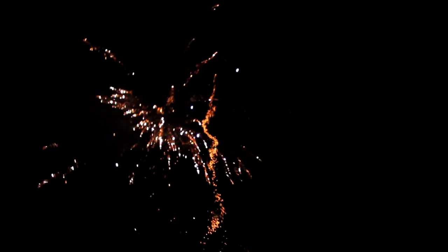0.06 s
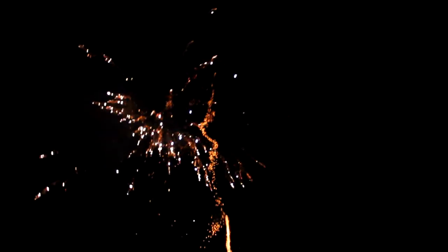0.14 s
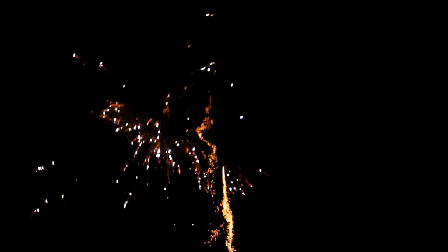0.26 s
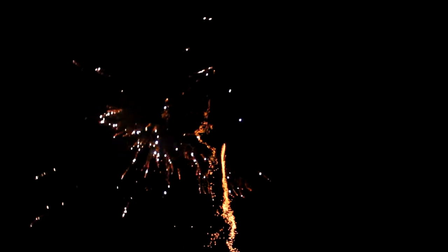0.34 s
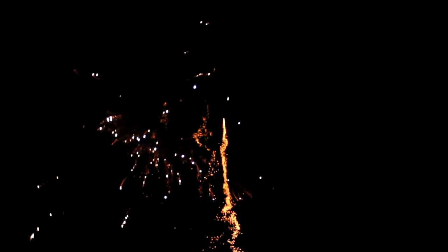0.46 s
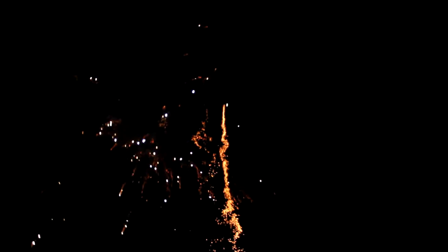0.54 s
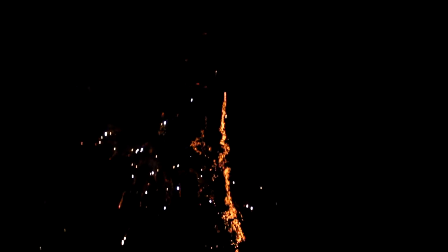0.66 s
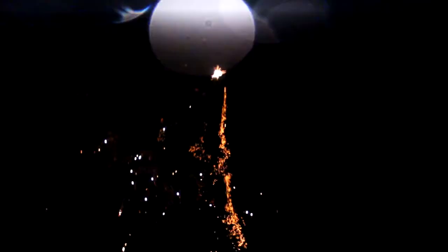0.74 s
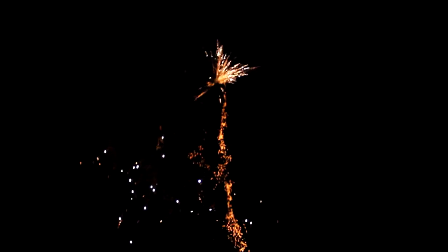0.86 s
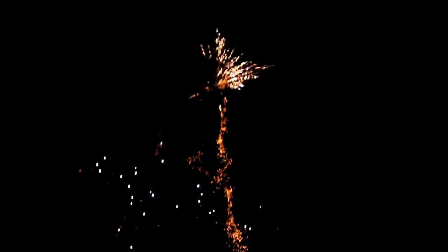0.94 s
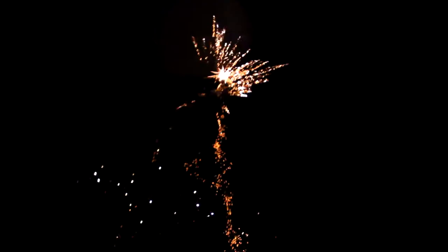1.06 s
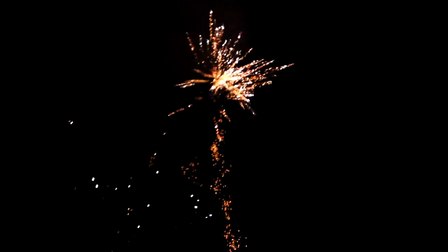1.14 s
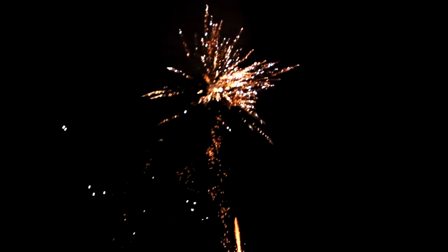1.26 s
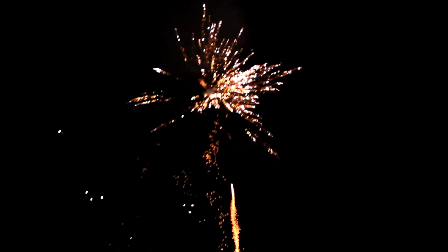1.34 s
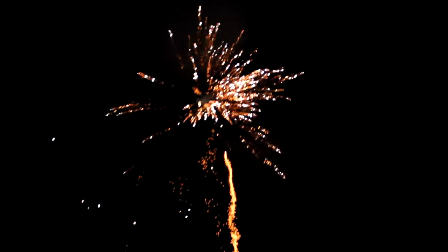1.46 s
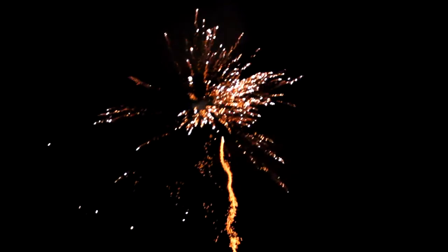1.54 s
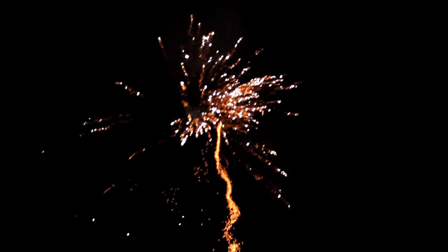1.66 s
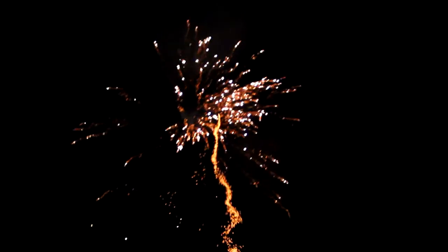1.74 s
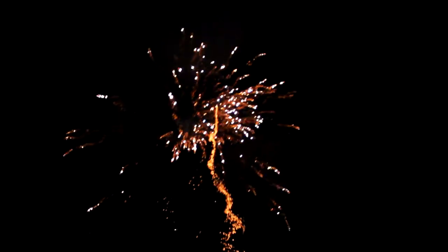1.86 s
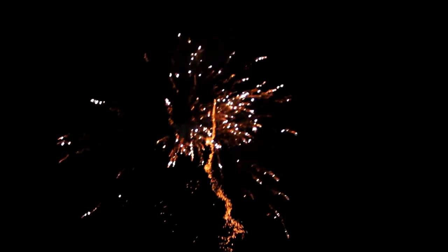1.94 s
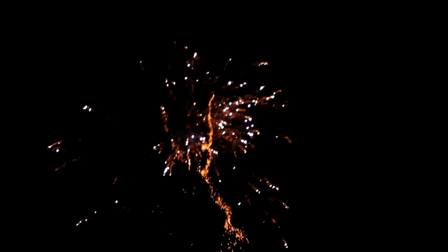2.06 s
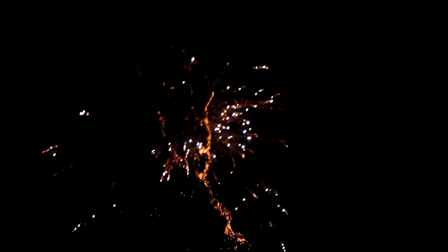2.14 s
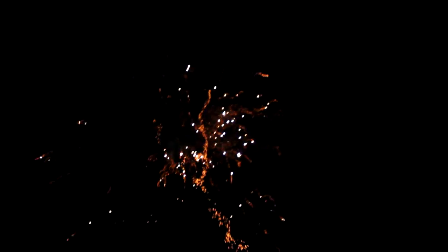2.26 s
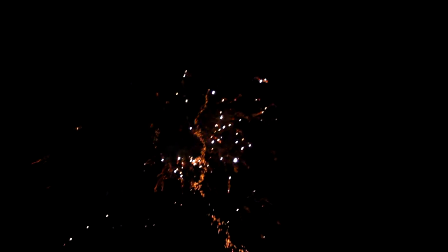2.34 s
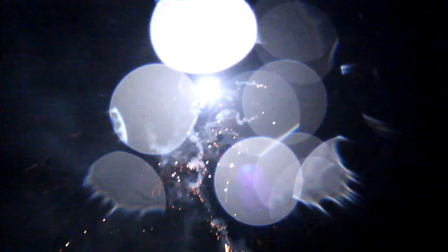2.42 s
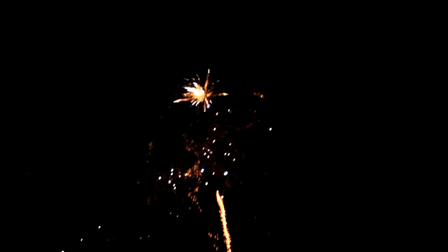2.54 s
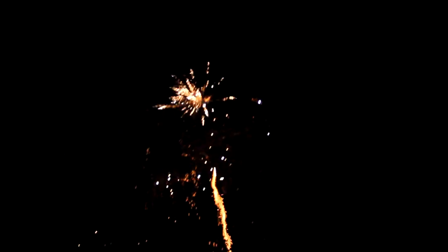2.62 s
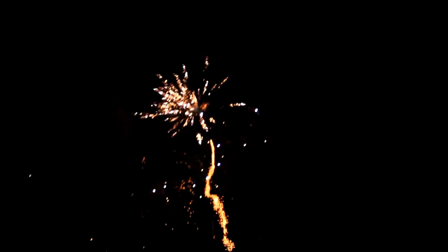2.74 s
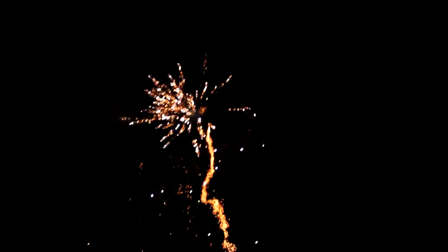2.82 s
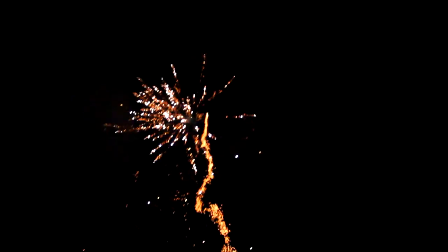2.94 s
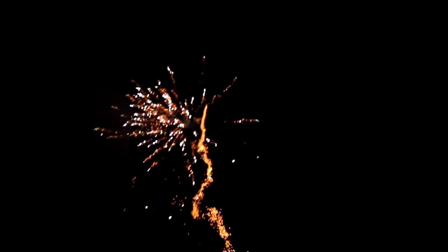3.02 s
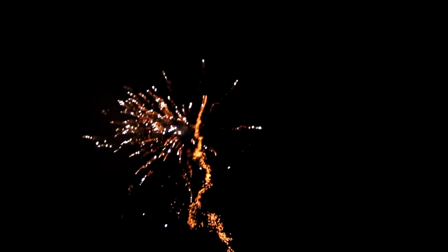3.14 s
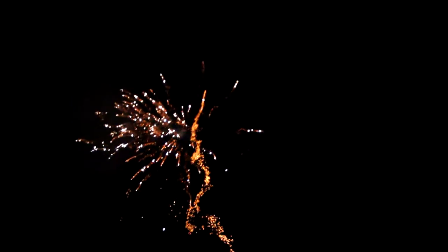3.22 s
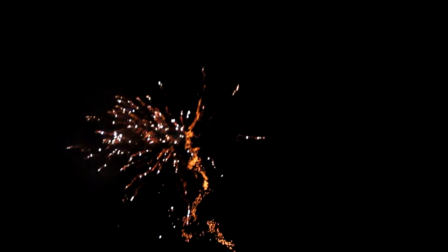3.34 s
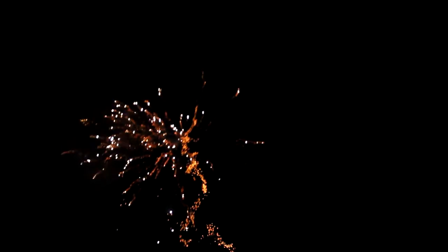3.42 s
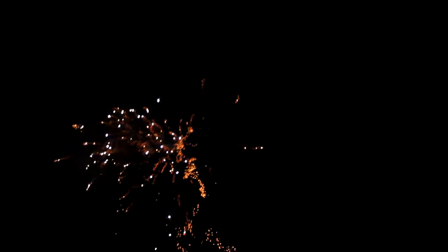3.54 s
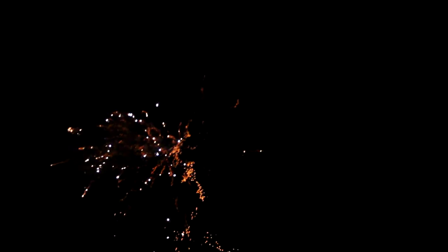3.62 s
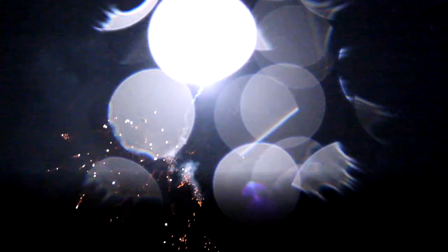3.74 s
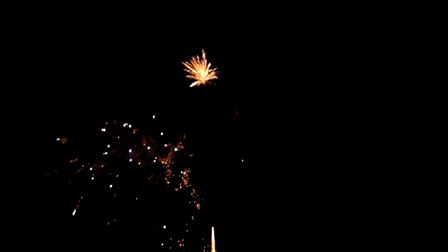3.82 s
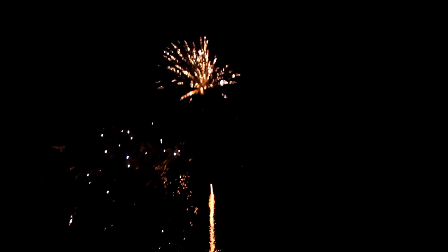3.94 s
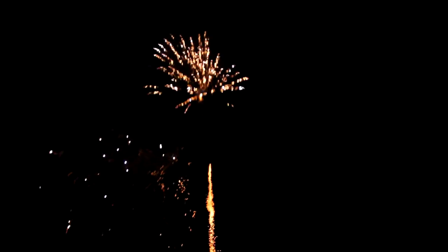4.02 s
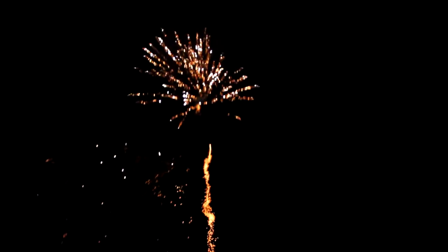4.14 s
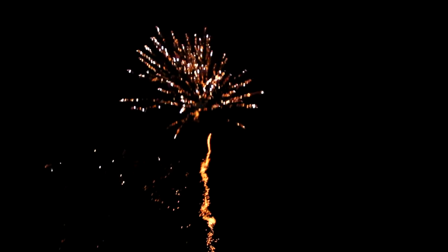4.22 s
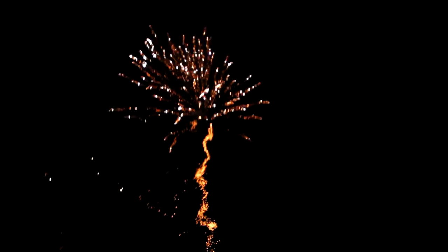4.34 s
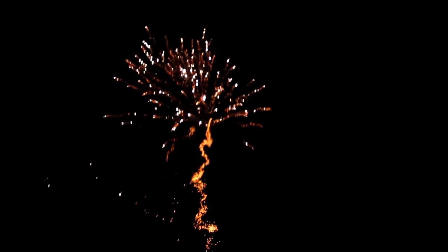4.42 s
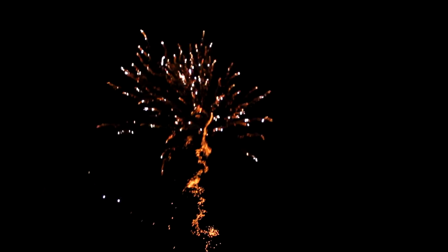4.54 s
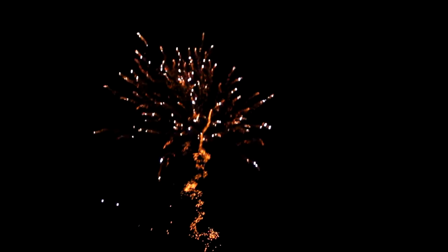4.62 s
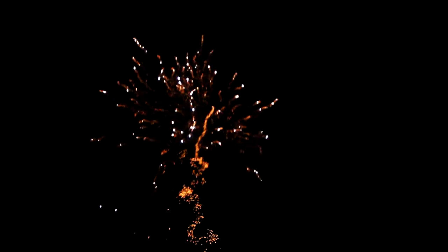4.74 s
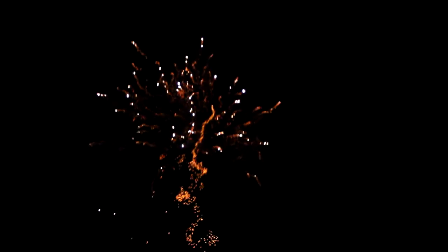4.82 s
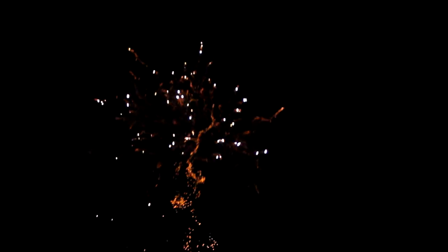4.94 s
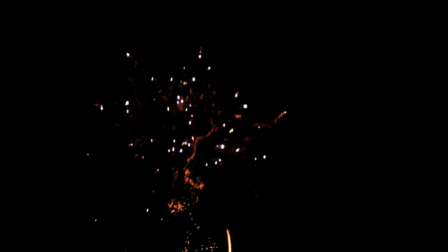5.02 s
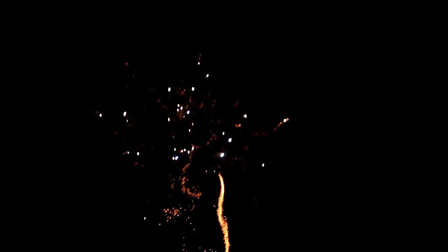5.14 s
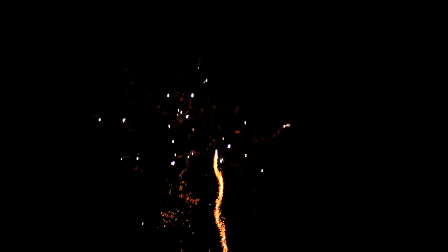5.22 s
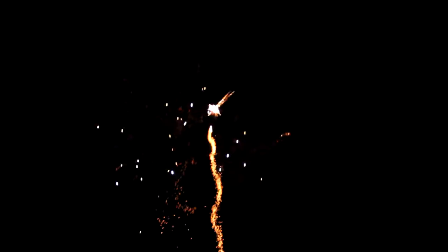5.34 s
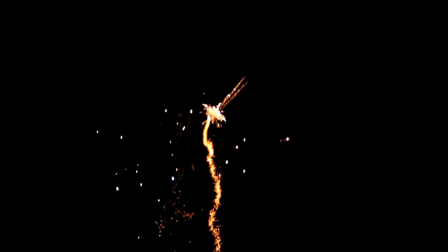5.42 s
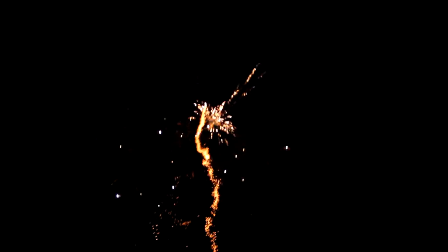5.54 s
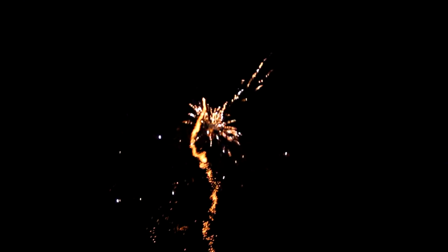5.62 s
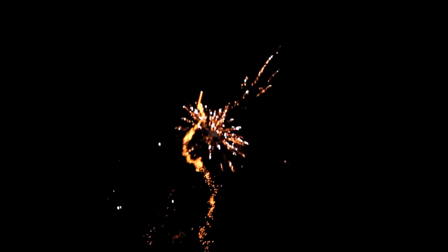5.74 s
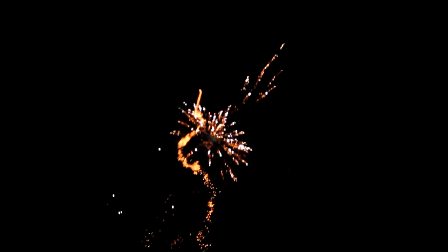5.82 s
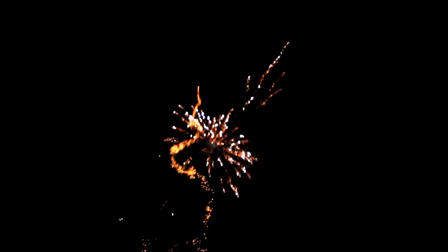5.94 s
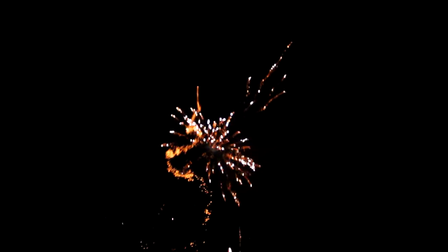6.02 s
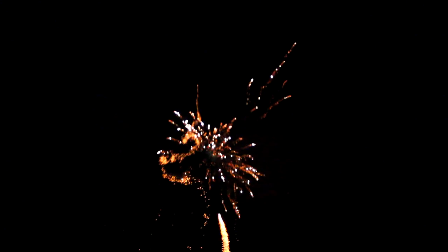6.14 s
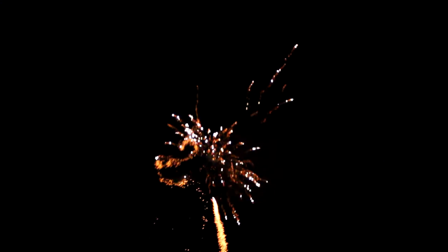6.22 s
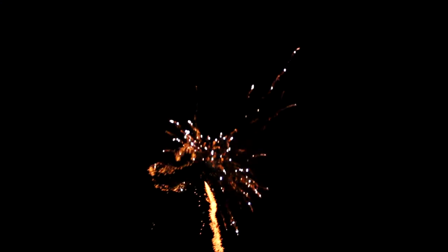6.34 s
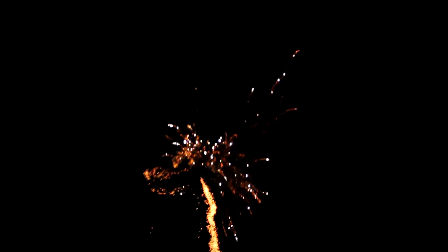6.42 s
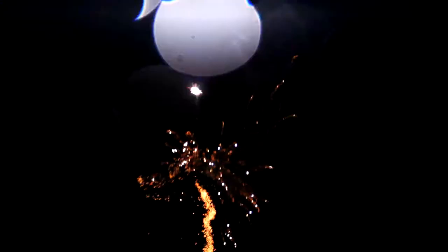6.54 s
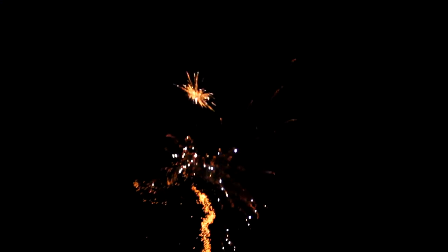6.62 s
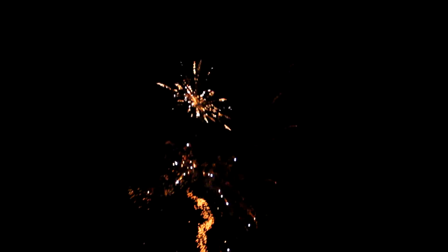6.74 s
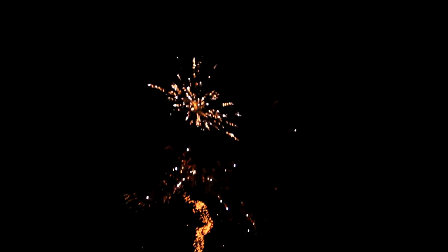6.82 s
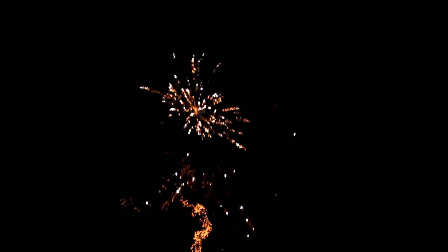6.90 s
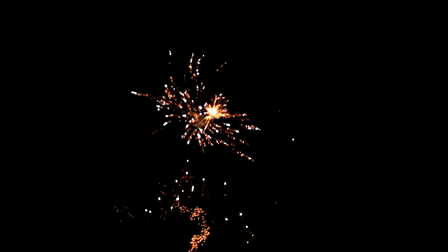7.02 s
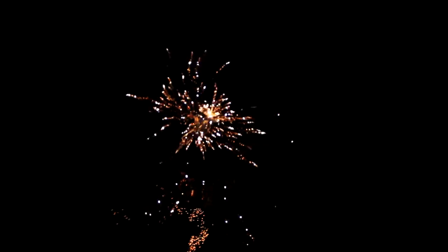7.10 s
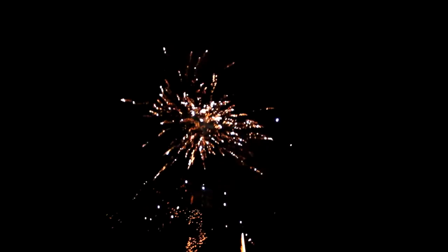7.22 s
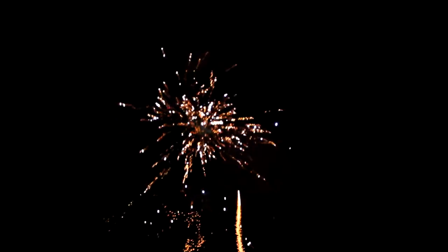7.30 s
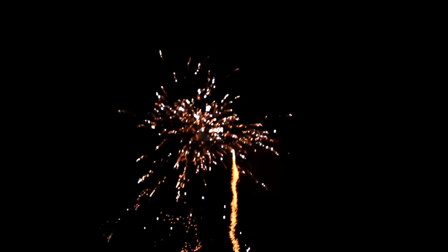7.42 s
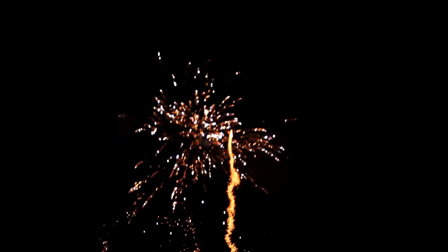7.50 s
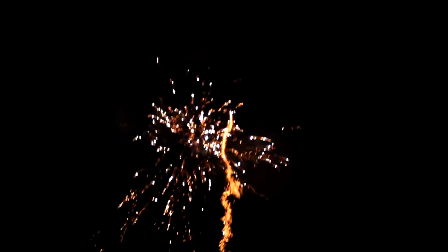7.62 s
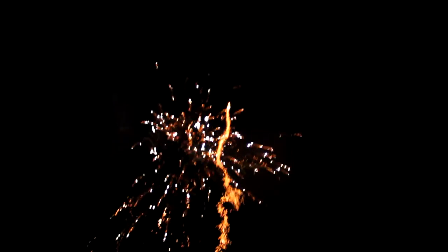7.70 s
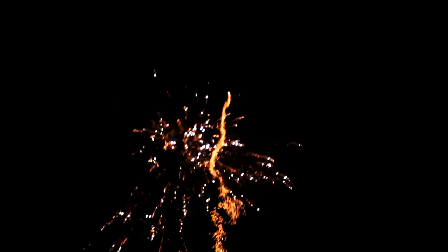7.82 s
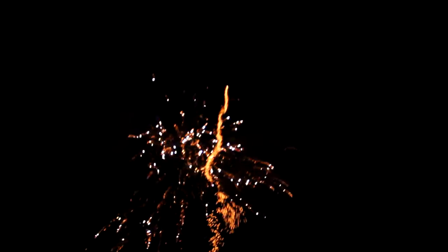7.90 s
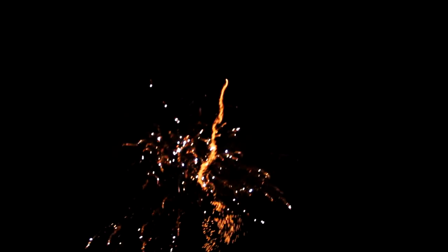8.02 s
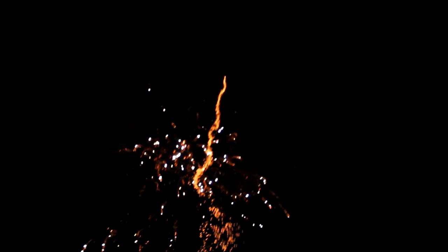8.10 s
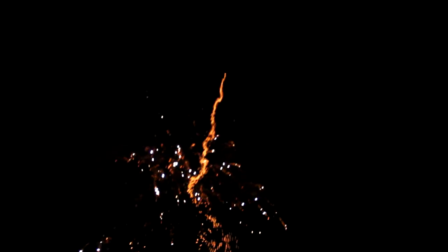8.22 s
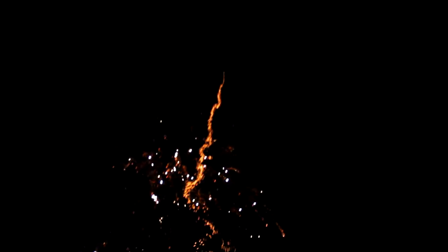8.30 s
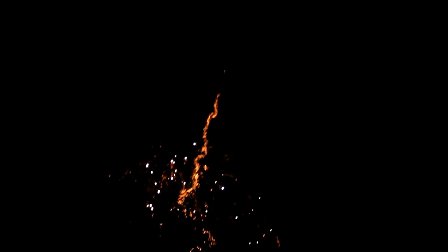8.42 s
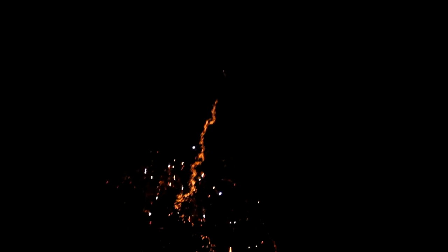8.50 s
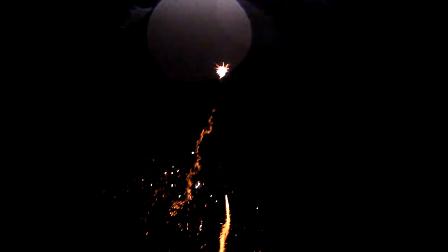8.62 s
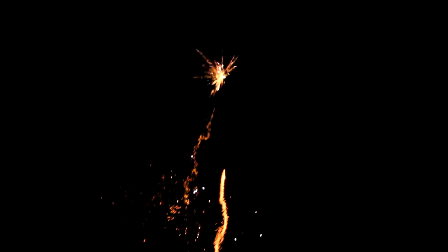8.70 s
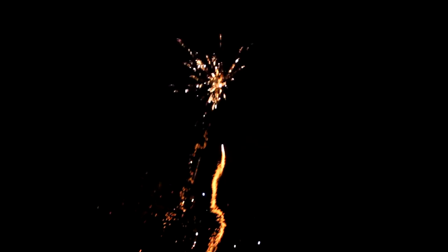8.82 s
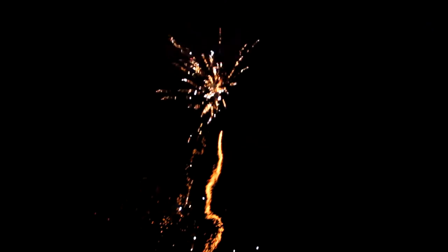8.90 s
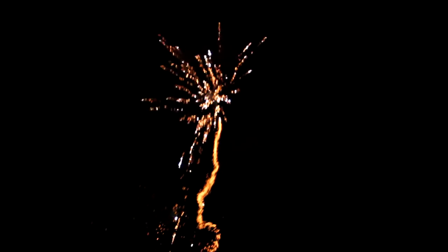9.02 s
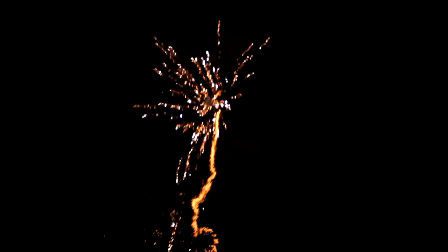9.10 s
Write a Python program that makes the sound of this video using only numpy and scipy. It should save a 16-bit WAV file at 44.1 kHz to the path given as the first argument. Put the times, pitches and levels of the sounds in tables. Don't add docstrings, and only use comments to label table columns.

```python
import sys
import numpy as np
from scipy import signal
from scipy.fft import rfft, irfft
from scipy.io import wavfile
from scipy.ndimage import uniform_filter1d

SR = 44100
rng = np.random.default_rng(int(sys.argv[2]) if len(sys.argv) > 2 else 0)


def generate_wav(sig):
    pcm = np.round(np.clip(np.atleast_2d(sig).T, -1, 1) * 32767).astype(np.int16)
    wavfile.write(sys.argv[1], SR, pcm)


def volts_from_decibels(level):
    exponent = np.asarray(level, float) / 20
    return 10 ** exponent


N = 403956

# (time [s], blast [dB], house echoes [dB], rolling tail [dB], ground thump [dB])
LIFT_CHARGES = [
    (-.085, 25, -8, -17, -40),
    (1.0455, -0.5, -15.5, -26, -57),
    (2.219, 17, -5, -17.5, -55),
    (3.579, 18, -6, -17.5, -9.5),
    (4.8312, 16.5, -7.5, -16, -5),
    (5.7748, 1, -12, -22, -26),
    (7.0221, 6.5, -11, -20, -21.5),
    (8.3011, 17, -6, -16, -6),
]
# (time [s], blast [dB], near wall [dB], far front [dB], thump [dB])
SHELL_BURSTS = [
    (0.8806, 16, 5, -36, -50),
    (1.1625, -7, -16, -39, -58),
    (2.5734, 10.5, -6.5, -7.5, -60),
    (3.8757, 8.5, -12, -14.5, -24),
    (5.4523, 12.5, 2.5, -9.5, -37.5),
    (6.6845, 14, 2, -10, -50.5),
    (7.0819, -2.5, -12, -13.5, -39),
    (8.744, 10, -11, -12.5, -29.5),
]


def colour(x, points):
    hz, db = np.transpose(points)
    f = np.maximum(np.fft.rfftfreq(len(x), 1 / SR), 1)
    return irfft(rfft(x) * volts_from_decibels(np.interp(np.log(f), np.log(hz), db)), len(x))


def unit(x):
    return x / np.sqrt(np.mean(x ** 2))


def band(x, hz, octaves):
    edges = np.minimum(hz * 2 ** (np.array([-.5, .5]) * octaves), [.44 * SR, .49 * SR])
    return signal.sosfilt(signal.butter(2, edges, "band", fs=SR, output="sos"), x)


def shape(x, gain):
    hz, t, z = signal.stft(x, SR, nperseg=256)
    return signal.istft(z * gain(hz[:, None] + 1, t), SR, nperseg=256)[1][:len(x)]


def walk(rate):
    k = int(SR / rate)
    held = np.repeat(rng.standard_normal(N // k + 1), k)
    slewed = uniform_filter1d(uniform_filter1d(held, k), k)
    return unit(slewed[:N])


def add(out, s, sound):
    i = int(round(s * SR))
    part = sound[max(-i, 0):len(out) - i]
    out[max(i, 0):max(i, 0) + len(part)] += part


def after(rows, fade_s):
    times = np.sort([row[0] for row in rows])

    def trace(t):
        latest = times[np.maximum(np.searchsorted(times, t) - 1, 0)]
        return np.exp(-(t - latest) / fade_s) * (t > times[0])
    return trace


def roar():
    # (time [s], roar [dB])
    comet_level = [(0.0, -32), (0.5, -34), (0.76, -30), (1.1, -34), (1.6, -40), (2.3, -30), (3.01, -33),
                   (3.72, -28), (4.26, -34.5), (4.85, -31), (5.4, -36.5), (6.5, -37.5), (6.81, -29.5),
                   (7.35, -36.5), (7.6, -37), (8.19, -25.5), (8.54, -30), (9.16, -34.5)]
    # (frequency [Hz], level [dB per Hz])
    roar_colour = [(18, -74.5), (30, -58.5), (128, -16.5), (202, -3), (240, -6), (377, -5.5), (417, 1),
                   (497, -1.5), (863, -2), (1460, -9), (2020, -12.5), (6100, -35.5), (12000, -56),
                   (15600, -80), (22000, -120)]
    since_lift = after(LIFT_CHARGES, 0.58)
    rush = after([*LIFT_CHARGES, *SHELL_BURSTS], 0.81)
    hush = after(SHELL_BURSTS, 0.48)

    def level_db(t):
        return np.interp(t, *np.transpose(comet_level))

    def tilt(f, t):
        bass = np.clip(np.log2(420 / f), 0, 1)
        throat = np.exp(-np.log2(f / 710) ** 2 / 0.29)
        treble = np.clip(np.log2(f / 1300), 0, 1.5)
        bass_db = bass * (-2.5 - 1 * since_lift(t) - 11 * hush(t))
        throat_db = throat * -0.03 * (level_db(t) + 32)
        treble_db = treble * (-4.0 + 12 * rush(t))
        return volts_from_decibels(bass_db + throat_db + treble_db)

    wash = shape(unit(colour(rng.standard_normal(N), roar_colour)), tilt)
    return wash * volts_from_decibels(level_db(np.arange(N) / SR) + 1.33 * walk(30))


def fizz():
    # (frequency [Hz], level [dB per Hz])
    crack_colour = [(1500, -4), (3000, 9.5), (6000, 9), (10000, 5.5), (16000, 1.5)]
    # (peak time [s], rise [s], hold [s], level [dB])
    spitting = [(0.858, 0.33, .02, -51), (2.13, .28, .09, -52.5), (2.8, .1, 0.09, -71),
                (3.56, .5, .02, -55.5), (4.202, .1, 0.16, -65), (4.822, .3, .02, -51.5),
                (5.44, .5, .02, -55.5), (6.37, .27, .02, -52), (6.61, 0.2, .05, -59.5),
                (7.83, 0.21, 0.48, -54), (8.544, .1, 0.045, -56.5), (8.997, 0.093, 0.11, -72)]
    # (time [s], pitch [Hz], level [dB])
    gas_whistles = [
        [(1.86, 7600, -68), (1.95, 8900, -64), (2.06, 9100, -64), (2.14, 8500, -61), (2.215, 7400, -58)],
        [(8.1, 4300, -60), (8.16, 4180, -50), (8.295, 3950, -49)],
    ]
    rise_db, fall_db_per_s = 17, 83
    t = np.arange(N) / SR
    cracks = unit(colour(rng.standard_normal(N) * volts_from_decibels(2.0 * rng.exponential(size=N)), crack_colour))
    gain = np.zeros(N)
    for s, rise_s, hold_s, db in spitting:
        climb_db = rise_db * np.maximum(s - t, 0) / max(rise_s, .03)
        fall_db = fall_db_per_s * np.maximum(t - s - hold_s, 0)
        gain += volts_from_decibels(db - climb_db - fall_db)
    out = cracks * gain * volts_from_decibels(0.91 * walk(2))
    for rows in gas_whistles:
        s, hz, db = np.transpose(rows)
        pitch = np.interp(t, s, hz) * (1 + .014 * walk(300))
        phase = 2 * np.pi * np.cumsum(pitch) / SR
        out += np.sin(phase) * volts_from_decibels(np.interp(t, s, db, -200, -200) + 2 * walk(60))
    return out


def sparks():
    # (time [s], peak [dB], centre [Hz], length [ms])
    pops = [(.7667, -43, 7000, 2), (1.3794, -47, 10100, 0.83), (2.2158, -11.5, 6640, 1.5),
            (3.0100, -23, 2410, 3.8), (3.575, -15, 3020, 4.4), (4.829, -22, 4030, 3),
            (5.045, -42, 7000, 0.84), (6.2644, -48, 11160, .6), (6.578, -22, 4000, 0.4),
            (.138, -21, 1900, 4.9), (1.044, -9, 4400, 1), (6.6184, -44, 8900, .6), (7.8496, -55, 5000, 1.7),
            (8.2948, -12, 1500, 2.3), (8.299, -4.5, 4500, 1.4)]
    out, t = np.zeros(N), np.arange(600) / SR
    for s, db, hz, ms in pops:
        puff = rng.standard_normal(len(t)) * np.exp(-t * 1000 / ms)
        add(out, s, volts_from_decibels(db + 7.0) * band(puff, hz, 1.02))
    return out


def flutter():
    gap_ms, lag_ms, skew_ms = 70.6, -9, 5
    boom_hz, boom_db, loss_db, per_tail_db = 200.3, -14.0, -1.48, 0.75
    out, ms = np.zeros(N), np.arange(1500) * 1000 / SR
    swell = np.exp(-(ms / 4 - 3) ** 2 / 2)
    for s, _, _, tail_db, _ in LIFT_CHARGES:
        chance = rng.standard_normal((14, 2)) * [1.5, .08]
        for k, (size_db, tune) in enumerate(chance, start=1):
            boom = swell * np.sin(2 * np.pi * boom_hz * (1 + tune) * ms / 1000)
            late_ms = lag_ms + k * gap_ms + skew_ms * (k % 2) * .8 ** k
            db = boom_db + per_tail_db * tail_db + loss_db * k + size_db
            add(out, s + late_ms / 1000, boom * volts_from_decibels(db))
    return out


def thump(width_s):
    u = np.arange(2000) / (SR * width_s)
    return u * np.exp(1 - u)


def blast(push_ms):
    u = np.arange(400) / (SR * push_ms / 1000)
    return (1 - u) * np.exp(-.8 * u)


def paths(wave, table, scatter_db, order=2):
    out = np.zeros(int(.36 * SR))
    t_ms = np.arange(2000) * 1000 / SR
    for ms, db, smear_ms, top_hz in table:
        scatter = rng.standard_normal(len(t_ms)) * np.sqrt(t_ms) * np.exp(-t_ms / smear_ms)
        surface = volts_from_decibels(scatter_db) * scatter / np.sqrt(np.sum(scatter ** 2))
        surface[0] += 1
        dulling = signal.butter(order, min(top_hz, .45 * SR), fs=SR, output="sos")
        add(out, ms / 1000, volts_from_decibels(db) * signal.sosfilt(dulling, np.convolve(wave, surface)))
    return out


def rolling(quick_db, quick_s, houses_s):
    # (frequency [Hz], t60 [s])
    tail_decay = [(150, 0.77), (500, 0.21), (1500, 0.44), (4000, 0.7), (8000, 0.47), (15000, 0.32)]
    # (frequency [Hz], level [dB per Hz])
    tail_colour = [(35, -62.5), (60, -64), (189, 4), (281, -12), (607, 2.5), (1250, 1), (1470, -3),
                   (5720, -11), (16000, -20.5)]
    t = np.arange(2 ** 16) / SR
    hz, t60 = np.transpose(tail_decay)
    noise = unit(colour(rng.standard_normal(len(t)), tail_colour))
    slaps_db = 8 * uniform_filter1d(np.minimum(rng.exponential(size=600), 2.5), size=3)

    def fading(f, s):
        decay_db = -60 * s / np.interp(np.log(f), np.log(hz), t60)
        lumps_db = (slaps_db[:len(s)] - 9) / (1 + (f / 3000) ** 2)
        return volts_from_decibels(decay_db + lumps_db)

    strength = np.where(t < houses_s, .4, 1) + volts_from_decibels(quick_db) * np.exp(-t / quick_s)
    build_up = 1 - np.exp(-t / .006)
    return shape(noise, fading) * strength * build_up


def bursts():
    # (delay [ms], gain [dB], smear [ms], top [Hz])
    sky_paths = [(0, 11, .3, 16000), (1.8, 10, .6, 9000), (4.8, -9, 2, 9000), (7, -12, 2, 6000),
                 (9.3, 3, .8, 7000), (12.5, -10, 2, 5000), (15, -6, 2, 4000), (27, -19, 3, 2500)]
    # (delay [ms], gain [dB], smear [ms], top [Hz])
    wall_paths = [(0, -2, 1, 4000), (4.9, -2, 1.5, 5500), (17, -15, 4, 2500)]
    # (delay [ms], gain [dB], smear [ms], top [Hz])
    front_paths = [(0, -5, 3, 3000), (5, -4, 4, 3000), (28, -9, 5, 2200), (143, -10, 10, 1800)]
    # (near wall [ms], far front [ms])
    answer_delays = [(51.6, 238), (56, 190), (53, 192), (59, 196), (48.7, 188), (49.5, 190), (55, 191),
                     (54, 195)]
    # (time [s], peak [dB])
    stray_echoes = [(0.561, -18), (2.709, -18), (3.008, -19.5), (3.029, -23), (3.189, -21), (2.933, -18.5),
                    (3.948, -21), (4.006, -18), (5.588, -24), (6.45, -23.5), (6.49, -23.5), (6.62, -19),
                    (7.42, -28), (8.029, -17.5), (8.127, -17), (8.208, -9.5)]
    out = np.zeros(N)
    for (s, db, wall_db, front_db, _), (wall_ms, front_ms) in zip(SHELL_BURSTS, answer_delays):
        wave = blast(.24 * volts_from_decibels(.1 * db))
        add(out, s, volts_from_decibels(db) * paths(wave, sky_paths, -4))
        add(out, s + wall_ms / 1000, volts_from_decibels(wall_db) * paths(wave, wall_paths, -4))
        add(out, s + front_ms / 1000, volts_from_decibels(front_db) * paths(wave, front_paths, 6, order=4))
        add(out, s, volts_from_decibels(-33 + 0.77 * db) * rolling(12, .014, .05))
    ring_hz, ring_width_hz, ring_db, cut_hz = 1008, 406, -2, 275
    ring = signal.iirpeak(ring_hz, ring_hz / ring_width_hz, fs=SR)
    out = signal.lfilter(*signal.butter(1, cut_hz, "high", fs=SR), out)
    out = out + volts_from_decibels(ring_db) * signal.lfilter(*ring, out)
    for s, db in stray_echoes:
        add(out, s, volts_from_decibels(db) * paths(blast(0.59), [(0, 0, 7.9, 2800)], 8.2, order=4))
    return out


def lifts():
    # (delay [ms], gain [dB], smear [ms], top [Hz])
    tube_paths = [(0, 4, .4, 16000), (5.0, 2, .8, 6000), (8.4, -7, 2, 3500), (12, -12, 3, 3500),
                  (19, -19, 2, 7000), (24, -18, 1.5, 4000)]
    # (delay [ms], gain [dB], smear [ms], top [Hz])
    house_paths = [(74.2, -2, 1.5, 6000), (79.3, 2, 1.5, 6500), (101.8, -3, 1, 3000), (137, -6, 5, 2500),
                   (215, -7, 2, 3500), (221, -7, 3, 3000), (250, -10, 3, 2000), (310, -12, 4, 1200)]
    jet_colour = [(300, -3.5), (600, -12.0), (3000, -2.0), (16000, -16)]  # (Hz, dB per Hz)
    out, t = np.zeros(N), np.arange(3000) / SR
    for s, db, echo_db, tail_db, _ in LIFT_CHARGES:
        wave = blast(.42 * volts_from_decibels(.15 * db))
        jet = unit(colour(rng.standard_normal(len(t)), jet_colour)) * np.exp(-t / .006)
        add(out, s, volts_from_decibels(db) * paths(wave, tube_paths, -5))
        add(out, s, volts_from_decibels(echo_db) * paths(wave, house_paths, -1, order=4))
        add(out, s, volts_from_decibels(46 + 2.6 * tail_db) * jet)
        add(out, s, volts_from_decibels(tail_db) * rolling(11, .011, .075))
    return out


def scene():
    # (frequency [Hz], width [Hz], level [dB])
    cavity_rings = [(586, 390, -1), (1500, 360, -8)]
    thumps = np.zeros(N)
    for row in [*LIFT_CHARGES, *SHELL_BURSTS]:
        add(thumps, row[0], volts_from_decibels(row[-1] + 8) * thump(0.0015))
    bangs = lifts() + bursts()
    rings = np.zeros(N)
    for hz, width_hz, db in cavity_rings:
        rings += volts_from_decibels(db) * signal.lfilter(*signal.iirpeak(hz, hz / width_hz, fs=SR), bangs)
    low_cut = signal.butter(3, 290, "high", fs=SR, output="sos")
    heard_bangs = signal.sosfilt(low_cut, bangs + rings)
    return (heard_bangs + thumps + roar() + fizz() + sparks() + flutter())[None]


def top_cut(x):
    return signal.sosfilt(signal.butter(12, 16370, fs=SR, output="sos"), x)


def record(dry):
    hiss = volts_from_decibels(-79) * rng.standard_normal(N)
    clipped = np.clip(dry[0] + hiss, -.99, .99)
    rolled = colour(clipped, [(14000, 0), (15700, -1.5), (16300, -14), (17000, -20), (19000, -30)])
    return top_cut(rolled[None])


dry = scene()
out = record(dry)
generate_wav(out)
```